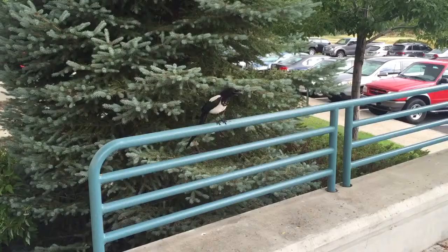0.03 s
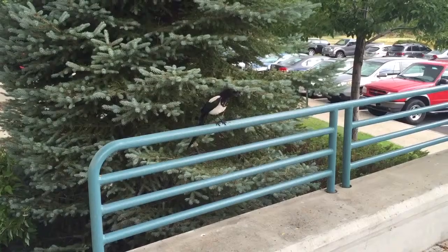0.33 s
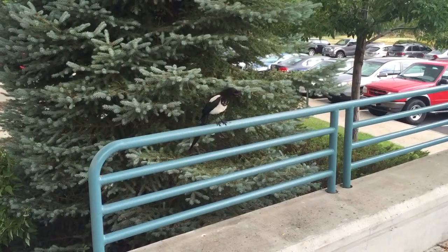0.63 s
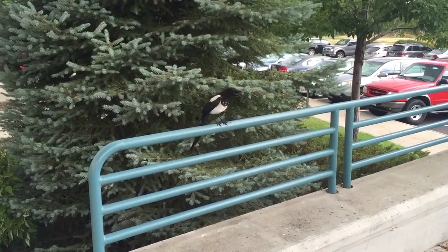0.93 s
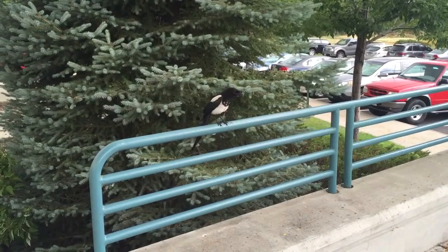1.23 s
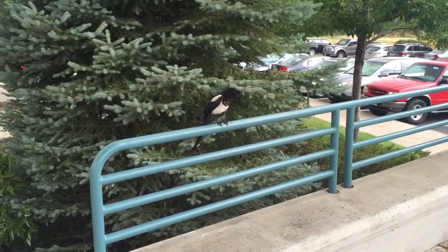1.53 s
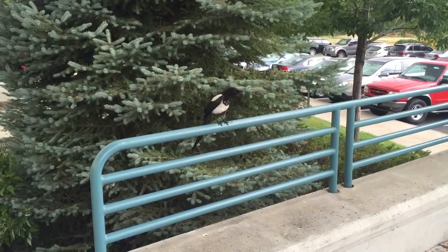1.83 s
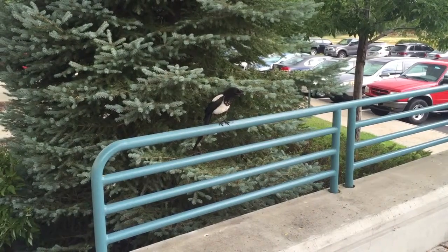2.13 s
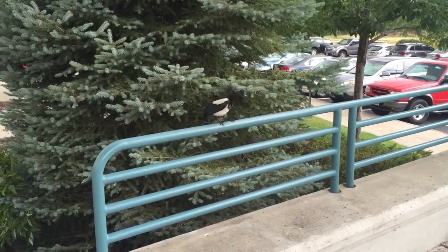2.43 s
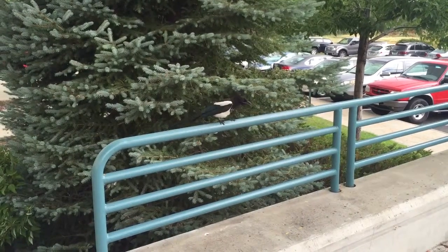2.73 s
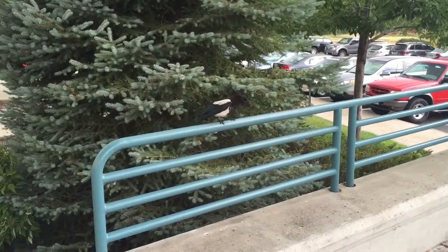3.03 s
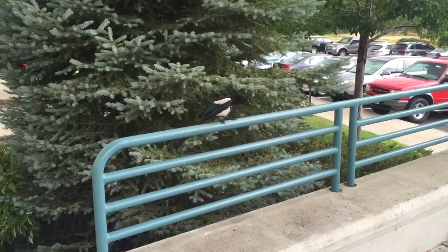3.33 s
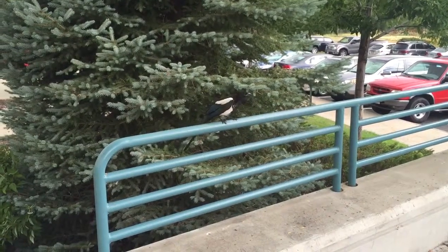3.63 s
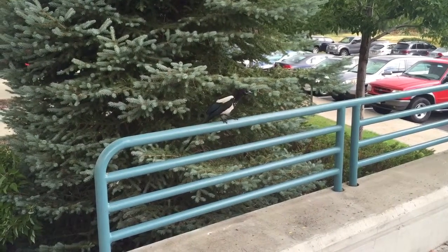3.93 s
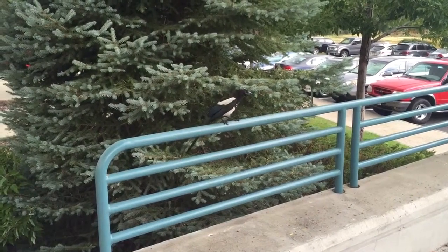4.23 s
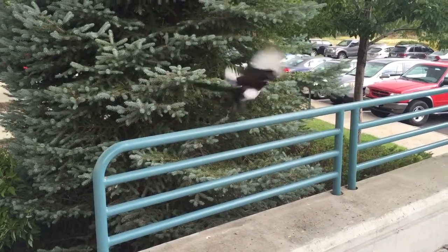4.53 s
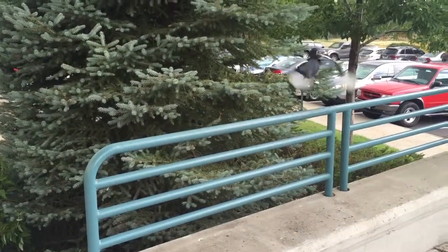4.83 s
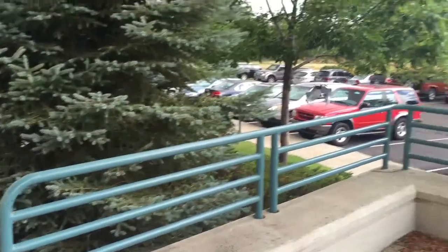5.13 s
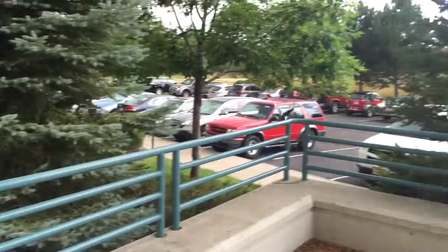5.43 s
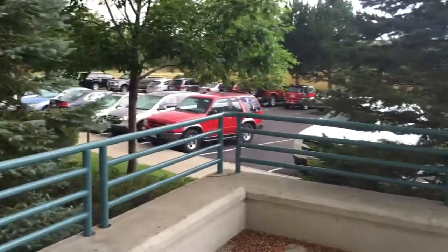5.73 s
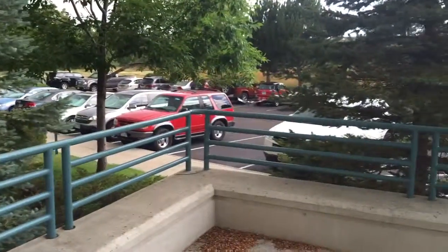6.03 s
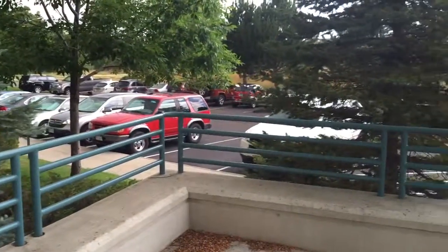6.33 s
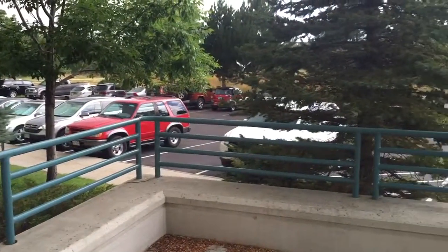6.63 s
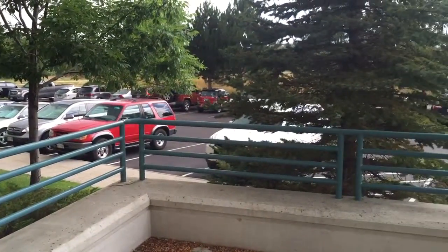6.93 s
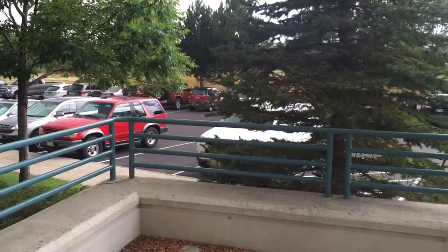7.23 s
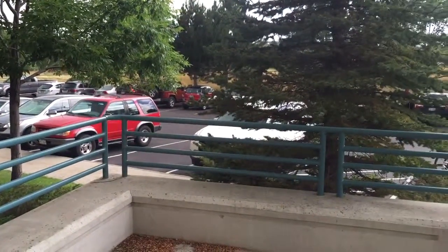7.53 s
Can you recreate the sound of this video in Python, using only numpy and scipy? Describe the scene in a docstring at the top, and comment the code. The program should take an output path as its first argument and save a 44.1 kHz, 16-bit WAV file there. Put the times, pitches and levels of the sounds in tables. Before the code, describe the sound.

A magpie chatters harshly nearby in three bursts, then fades away still calling as wind buffets the microphone over distant traffic.

```python
"""Far traffic drones and birds call faintly; then a magpie on a railing beside a car park
chatters in three bursts and flies off, still calling. Each syllable is a rough upward sweep
of the syrinx through the resonances of throat and beak, echoed by concrete and parked cars.
A few small ticks sound close by; from about halfway, wind eddies buffet the microphone."""
import sys
import numpy as np
from scipy import signal
from scipy.fft import rfft, irfft, next_fast_len
from scipy.io import wavfile
from scipy.ndimage import uniform_filter1d

SR = 44100
rng = np.random.default_rng(int(sys.argv[2]) if len(sys.argv) > 2 else 0)


def dump(signal):
    """Clip the signal to [-1, 1] and save it as 16-bit WAV at the path in sys.argv[1]."""
    limited = np.clip(np.atleast_2d(signal).T, -1, 1)
    pcm = np.round(limited * 32767).astype(np.int16)
    wavfile.write(sys.argv[1], SR, pcm)


N = 339570
TIME_S = np.arange(N) / SR
CUTOFF_HZ = 15300
PEAK_LEAD_S = 0.019  # effort peaks this long before the pitch crest

# road noise: freq_hz, gain_db
ROAD_SPECTRUM = [(12, -83.5), (20, -26), (35, -14.5), (49, -4), (194, -5), (229, -5.5), (263, -12),
                 (367, -16), (445, -20), (620, -19.5), (753, -23.5), (914, -21), (1310, -25.5),
                 (1510, -28.5), (15000, -58.5)]
# road noise: time_s, level_db
ROAD_LEVEL = [(0, -42.5), (.9, -46.5), (1.2, -44), (1.6, -43.5), (2.4, -44), (3.4, -44), (5.8, -45.5),
              (7.7, -47)]
# one curve per engine: time_s, pitch_hz, level_db
ENGINE_CURVES = [
    [(0, 103.4, -44), (.35, 106, -46), (.65, 107, -67)],
    [(1.3, 148, -57.5), (2.0, 150.2, -45), (2.5, 153.3, -46), (3.1, 153, -55.5)],
]
# distant bird: time_s, pitch_hz, level_db
WHISTLE_CURVE = [(.23, 2030, -56.5), (.255, 1980, -57.5), (.32, 2000, -49.5), (.35, 1990, -50),
                 (.367, 1996, -41), (.39, 2010, -56.5), (.45, 2005, -65)]
# distant magpie: start_s, crest_s, opening_hz, crest_hz, level_db
FAR_MAGPIE_SYLLABLES = [(0.40, 0.50, 660, 790, -63), (1.795, 1.89, 600, 725, -60),
                        (1.985, 2.098, 610, 720, -60), (6.831, 6.929, 630, 787, -61),
                        (7.252, 7.35, 620, 778, -75.5), (7.499, 7.605, 613, 778, -70)]
# near magpie: start_s, crest_s, opening_hz, crest_hz, bend (1 even, more = late rise), roughness,
# level_db, swell_db, rasp_db, beak_hz, sizzle_db
MAGPIE_SYLLABLES = [(0.539, 0.63, 671, 875.0, 4.2, 0.2, -22.0, 2.5, -0.5, 5000, 2),
                    (0.704, 0.799, 475, 836.5, 1.21, 0.61, -22.5, 9.5, -0.5, 5040, 4),
                    (0.881, 0.984, 430.7, 768, 1.64, 0.42, -23.5, 11, -4, 4600, 2),
                    (2.511, 2.58, 505.6, 887, 1.07, 0.36, -22.5, 0, -1, 4870.0, -2),
                    (2.649, 2.754, 430.6, 871, 1.11, 0.36, -22.5, 12, 0, 5300, 1.5),
                    (2.836, 2.932, 413.2, 851, 1.32, 0.43, -24, 10, 0.5, 4570, -1.5),
                    (3.046, 3.135, 392.4, 832.5, 1.19, 0.55, -23, 12, -1.5, 4370, -2.0),
                    (3.249, 3.322, 443.6, 780, 1.78, 0.6, -27, 9, -4, 4540.0, -3.5),
                    (3.729, 3.798, 578.3, 847, 2.64, 0.54, -22, 7, -2.5, 4900, -0.5),
                    (3.877, 3.989, 396.7, 812, 1.44, 0.34, -23.5, 14.5, -1.5, 4740, 0),
                    (4.083, 4.173, 488.6, 702, 1.7, 0.62, -24.5, 6.5, -4, 4650.0, -2.5),
                    (4.286, 4.393, 476.3, 799, 1.11, 0.46, -23.5, 12, -5, 4740, -1.5),
                    (4.514, 4.602, 388, 852, 1, 0.47, -28, 7, -0.5, 4400, -2),
                    (4.686, 4.776, 445.6, 902, 1.03, 0.54, -29.0, 2, -2, 4270, 2.5),
                    (4.822, 4.897, 509, 742, 0.8, 0.48, -29.5, 5, -3, 4630, 2),
                    (5.003, 5.105, 457.4, 860, 1.23, 0.4, -29.5, 4, -3.5, 4580.0, 1),
                    (5.203, 5.301, 487.5, 877, 1.9, 0.5, -31, 6.0, -3, 4500.0, 0),
                    (5.432, 5.515, 506.4, 891, 1.82, 0.42, -32.5, 4, -4, 4270.0, -1)]
# throat and beak resonances: freq_hz, gain_db
THROAT_SPECTRUM = [(300, -45), (650, -21.5), (1100, -19.5), (1600, -6.5), (2000, -9.5), (2400, -1.5),
                   (2900, 1.5), (3400, -9), (3850, -10), (4900, -10), (6570, -12), (8370, -19.5),
                   (9790, -20.5), (15000, -36)]
# concrete and a wall: delay_s, gain_db
HARD_ECHOES = [(.0093, -11), (0.026, -29.5)]
# scattered share, rising as the bird flies off: time_s, scatter_db
SCATTER_CURVE = [(0, -27.5), (3.7, -29), (4.6, -26), (5.05, -19.5), (5.5, -18)]
# close ticks and a knock: start_s, level_db, centre_hz, t60_s
TICK_EVENTS = [(1.312, -63, 11350, 0.043), (2.41, -62.5, 11000, 0.015), (2.473, -33, 290, 0.14)]
# wind noise: freq_hz, gain_db
WIND_SPECTRUM = [(20, -30.5), (38, -26.5), (54, 8.5), (80, 2), (125, 5), (245, 3.5), (290, 1.5),
                 (480, -10.5), (650, -11.5), (1170, -22), (1800, -35.5), (2600, -58.5), (4000, -91.5)]
# wind between gusts: time_s, buffet_db, rush_db, rumble_db, eddy_hz
BREEZE_CURVE = [(3.45, -42.5, -52, -61, 150), (3.75, -37.5, -52, -42.5, 157), (4.42, -36, -42.5, -45, 157),
                (4.79, -27, -31.5, -35, 209), (4.88, -34.5, -40, -37.5, 186), (5.6, -32, -40, -40.5, 186),
                (5.74, -41, -40.5, -46.5, 185), (6.0, -33.5, -40, -42, 205), (6.29, -41.5, -42, -45, 191),
                (6.58, -32, -38, -33, 165.4), (6.76, -38.5, -45, -45, 160), (7.45, -31.5, -39, -41.5, 152),
                (7.7, -29, -37.5, -43.5, 142.3)]
# gusts: start_s, length_s, buffet_db, rush_db, rumble_db
GUST_EVENTS = [(3.505, 0.11, -32, -52.5, -53), (3.64, 0.042, -28, -43.5, -50), (4.274, 0.11, -43, -68, -38),
               (4.463, 0.15, -20.5, -26.5, -23.5), (4.59, 0.16, -21.5, -31.5, -20.5),
               (5.281, 0.05, -28, -38, -44), (5.45, 0.018, -23, -32.5, -35),
               (5.802, 0.054, -28.5, -37, -43), (5.919, 0.039, -25.5, -41, -36),
               (6.064, 0.023, -26.5, -40, -48), (6.127, .05, -22, -34.5, -51),
               (6.299, 0.062, -32, -39, -39), (6.419, 0.13, -26, -37, -36.5),
               (6.798, 0.13, -32, -37.5, -43), (7.021, 0.11, -26.5, -34.5, -35),
               (7.198, .05, -17, -33, -45), (7.285, .135, -20.5, -33, -43.5),
               (7.506, 0.1, -29.5, -40.5, -39)]


def from_db(db):
    """Decibels to gain."""
    return 10 ** (np.asarray(db) / 20)


def unit_rms(x):
    """Scale to rms 1."""
    return x / np.sqrt(np.mean(x ** 2) + 1e-20)


def follow(curve):
    """Each value column of a curve, per sample."""
    time_s, *columns = np.transpose(curve)
    return [np.interp(TIME_S, time_s, column) for column in columns]


def gate(curve, fade_s):
    """1 while a curve lasts, fading to 0 outside it."""
    return np.clip(1 + np.minimum(TIME_S - curve[0][0], curve[-1][0] - TIME_S) / fade_s, 0, 1)


def butter(x, hz, kind, order=2):
    """Butterworth filter."""
    return signal.sosfilt(signal.butter(order, hz, kind, fs=SR, output="sos"), x)


def split(x, hz, order=4):
    """Low and high bands that sum to x."""
    low = signal.sosfiltfilt(signal.butter(order, hz, fs=SR, output="sos"), x)
    return low, x - low


def colour(x, spectrum):
    """Apply a spectrum table; rms 1."""
    hz, db = np.transpose(spectrum)
    size = next_fast_len(len(x))
    bins_hz = np.maximum(np.arange(size // 2 + 1) * SR / size, 1)
    gain = from_db(np.interp(np.log(bins_hz), np.log(hz), db))
    return unit_rms(irfft(rfft(x, size) * gain, size)[:len(x)])


def flutter(size, rate_hz):
    """Random motion up to rate_hz; rms 1."""
    run_in = 4000
    return unit_rms(butter(rng.standard_normal(size + run_in), rate_hz, "low")[run_in:])


def flatten(x, window_s):
    """Hold short-term rms at 1, keeping the faster grain."""
    return x / np.sqrt(np.abs(uniform_filter1d(x ** 2, int(window_s * SR))) + 1e-9)


def convolve(x, response):
    """Apply an impulse response at unit energy."""
    return signal.fftconvolve(x, response / np.linalg.norm(response))[:len(x)]


def tone(curve, waver, waver_hz):
    """Sine with slightly unsteady pitch."""
    pitch_hz, level_db = follow(curve)
    phase = 2 * np.pi * np.cumsum(pitch_hz * (1 + waver * flutter(N, waver_hz))) / SR
    return np.sqrt(2) * np.sin(phase) * from_db(level_db) * gate(curve, fade_s=0.026)


def traffic():
    """Far road noise and two engines droning in the car park."""
    level_db, = follow(ROAD_LEVEL)
    road = colour(rng.standard_normal(N), ROAD_SPECTRUM) * from_db(level_db)
    return road + sum(tone(engine, waver=0.01, waver_hz=13) for engine in ENGINE_CURVES)


def far_whistle():
    """A distant bird's short, nearly pure note."""
    return tone(WHISTLE_CURVE, waver=0.0038, waver_hz=83.3)


def air_pressure(t, start_s, crest_s, bend):
    """Climbs from 0 to 1 at the crest, then drops."""
    rise = np.clip((t - start_s) / (crest_s - start_s), 0, 1) ** bend
    fall = np.clip((t - crest_s) / .045, 0, 1)
    return uniform_filter1d(rise - fall, size=300)


def pulse_train(phase, pitch_hz, lag_rad=.16):
    """Equal harmonics; the high ones lag, so each pulse is a chirp."""
    return unit_rms(sum(np.cos(k * phase - lag_rad * k * k) * (k * pitch_hz < CUTOFF_HZ)
                        for k in np.arange(1, CUTOFF_HZ // 400)))


def syrinx(t, start_s, crest_s, opening_hz, crest_hz, bend, roughness, end_roughness=.7):
    """Pulses sweep up and tip over; the membranes rattle at both ends and lock near the top."""
    progress = (t - start_s) / (crest_s - start_s)
    unlocked = np.clip(np.abs(progress - .7) / .48, 0, 1) ** 3
    roughness = roughness + end_roughness * unlocked
    pitch_hz = opening_hz * (crest_hz / opening_hz) ** air_pressure(t, start_s, crest_s, bend)
    pitch_hz *= 1 + 0.04116 * roughness * flutter(len(t), 150)
    phase = 2 * np.pi * np.cumsum(pitch_hz) / SR
    jittered = phase + .36 * roughness * flutter(len(t), 470)  # blurs mainly the high harmonics
    hiss = rng.standard_normal(len(t)) * (1 + 0.2 * np.cos(jittered))  # air escapes once a cycle
    # the throat tunes to harmonic 4, which rings unsteadily
    fourth = np.cos(4 * phase) * from_db(8.2 * flutter(len(t), 37))
    overtones = .4 * (np.cos(6 * phase) + np.sin(7 * phase) - np.cos(8 * phase))
    ringing = np.clip(1 - roughness, 0, 1) * (fourth + overtones)
    shimmer = from_db(1.5 * roughness * flutter(len(t), 260))
    return (pulse_train(jittered, pitch_hz) + .5 * roughness * hiss) * shimmer + ringing


def far_magpie(band_hz=(2300, 3200)):
    """Distance leaves only the strongest throat resonance."""
    out = np.zeros(N)
    for start_s, crest_s, opening_hz, crest_hz, level_db in FAR_MAGPIE_SYLLABLES:
        first = int(start_s * SR)
        span = slice(first, first + SR // 7)
        voice = syrinx(TIME_S[span], start_s, crest_s, opening_hz, crest_hz,
                       bend=1, roughness=.4, end_roughness=.3)
        voice = flatten(butter(voice, band_hz, "band"), window_s=.02)
        out[span] += voice * np.sqrt(np.hanning(len(voice))) * from_db(level_db)
    return out


def effort(t, start_s, crest_s, swell_db, attack_s=0.026, sag_db_per_s=129, release_db_per_s=562.5):
    """Syllable envelope in dB below its peak: attack, swell, sag, release."""
    peak_s = crest_s - PEAK_LEAD_S
    attack_db = 18 * np.maximum(1 - (t - start_s) / attack_s, 0) ** 2
    rise_db = swell_db * np.clip((peak_s - t) / (peak_s - start_s), 0, 1)
    sag_db = sag_db_per_s * np.maximum(t - peak_s, 0)
    release_db = release_db_per_s * np.maximum(t - crest_s - 0.0081, 0)
    return -(attack_db + rise_db + sag_db + release_db)


def scatter(x, share_db, t60_s):
    """Brief reflections off rails and branches, new at each turn of the head."""
    age_s = TIME_S[:SR // 50]
    spray = rng.standard_normal(len(age_s)) * from_db(-60 * age_s / t60_s) * np.minimum(age_s / .001, 1)
    return x + from_db(share_db) * convolve(x, spray)


def throat_body(band, hollow_db, past_peak_s, chest_hz=1940, ring_db=1, ring_width_s=0.023):
    """Low band: hollow while the beak is shut, ringing out at peak effort."""
    chest, ring = split(scatter(band, share_db=-5, t60_s=.014), chest_hz, order=3)
    body = flatten(chest * from_db(hollow_db) + ring, window_s=0.013)
    return body * from_db(ring_db * np.exp(-(past_peak_s / ring_width_s) ** 2))


def beak_rasp(band, beak_hz, top_db, sizzle_hz=7650):
    """High band: coloured by the beak's resonance, with sizzle on top."""
    resonance = signal.lfilter(*signal.iirpeak(beak_hz, Q=8.7, fs=SR), band)
    rasp = scatter(band + from_db(-1) * resonance, share_db=-3, t60_s=.012)
    rasp, sizzle = split(flatten(rasp, window_s=.015), sizzle_hz, order=2)
    return rasp + sizzle * from_db(top_db)


def magpie(rasp_hz=3410, rasp_sag_db_per_s=77):
    """Syrinx through throat and beak; the rasp grows as the beak opens and dies first."""
    out = np.zeros(N)
    for (start_s, crest_s, opening_hz, crest_hz, bend, roughness,
         level_db, swell_db, rasp_db, beak_hz, sizzle_db) in MAGPIE_SYLLABLES:
        first = int((start_s - .03) * SR)
        span = slice(first, first + SR // 4)
        t = TIME_S[span]
        effort_db = effort(t, start_s, crest_s, swell_db)
        past_peak_s = t - crest_s + PEAK_LEAD_S
        shut = np.clip(1 - (t - start_s) / (0.9 * (crest_s - start_s)), 0, 1)
        tight_db = 0.42 * swell_db  # a bigger swell starts with the beak shut tighter
        voice = syrinx(t, start_s, crest_s, opening_hz, crest_hz, bend, roughness)
        low, high = split(colour(voice, THROAT_SPECTRUM), rasp_hz)
        body = throat_body(low, (14 + tight_db) * shut, past_peak_s)
        top_db = sizzle_db + 1.5 + 0.45 * np.maximum(effort_db, -10) - 3.5 * shut
        dull_db = (5 + tight_db) * shut ** 2 + rasp_sag_db_per_s * np.maximum(past_peak_s, 0)
        rasp = beak_rasp(high, beak_hz, top_db) * from_db(rasp_db + 1.4 - dull_db)
        out[span] += (body + rasp) * from_db(level_db + effort_db)
    return out


def outdoors(x, tail_t60_s=0.58, tail_hz=3800, spruce_t60_s=0.2, spruce_hz=9100, spruce_db=-10.5):
    """Hard echoes, bright scatter off a spruce, and a dull tail that swells as parked cars reflect."""
    echoes = sum(from_db(gain_db) * np.interp(TIME_S - delay_s, TIME_S, x, left=0)
                 for delay_s, gain_db in HARD_ECHOES)
    age_s = TIME_S[:SR]
    onset = np.minimum(age_s / 0.0042, 1)
    cars_db = 7.5 * np.exp(-((age_s - .08) / 0.011) ** 2)
    dull = butter(rng.standard_normal(SR), tail_hz, "low") * from_db(cars_db - 60 * age_s / tail_t60_s)
    bright = butter(rng.standard_normal(SR), spruce_hz, "high", order=1)
    bright *= from_db(-60 * age_s / spruce_t60_s)
    scatter_db, = follow(SCATTER_CURVE)
    tail = convolve(x * from_db(scatter_db), dull * onset)
    spruce = from_db(spruce_db) * convolve(x, bright * onset)
    return x + echoes + tail + spruce


def ticks():
    """Two ticks and a knock: dying puffs of band-passed noise."""
    out = np.zeros(N)
    for start_s, level_db, centre_hz, t60_s in TICK_EVENTS:
        decay = (TIME_S > start_s) * from_db(-60 * np.clip((TIME_S - start_s) / t60_s, 0, 2))
        puff = butter(rng.standard_normal(N) * decay, [centre_hz / 1.9, centre_hz * 1.19], "band")
        out += puff * np.sqrt(SR / 2 / centre_hz) * from_db(level_db)
    return out


def wind_gains(attack_s=0.021, release_db_per_s=221):
    """Buffet, rush and rumble gains: gusts rise, hold and die away on top of the breeze."""
    power = (from_db(follow(BREEZE_CURVE)[:3]) * gate(BREEZE_CURVE, fade_s=0.65)) ** 2
    for start_s, length_s, *levels_db in GUST_EVENTS:
        rise = np.clip((TIME_S - start_s) / attack_s, 0, 1)
        fall = from_db(-release_db_per_s * np.clip(TIME_S - start_s - length_s, 0, 1))
        power += np.outer(from_db(levels_db), rise * fall) ** 2
    return np.sqrt(power)


def wind(rumble_top_hz=74, buffet_mid_hz=175, rush_bottom_hz=383, lumps_db=1.5, swirl_db=1.4):
    """Eddies at the microphone port: large ones rumble and thump, small ones rush in quick lumps."""
    buffet_gain, rush_gain, rumble_gain = wind_gains()
    eddy_hz = follow(BREEZE_CURVE)[-1]
    large, small = split(colour(rng.standard_normal(N), WIND_SPECTRUM), rush_bottom_hz)
    deep, middle = split(large, rumble_top_hz)
    slow, quick = split(middle, buffet_mid_hz)
    rumble = flatten(deep, window_s=0.037) * rumble_gain * from_db(-3)
    tilt = (eddy_hz / buffet_mid_hz) ** 5.2  # faster eddies shift the buffeting up
    buffet = flatten(slow + quick * tilt, window_s=.04) * buffet_gain
    rush = flatten(small * from_db(lumps_db * flutter(N, 70)), window_s=0.081) * rush_gain
    return (rumble + buffet + rush) * from_db(swirl_db * flutter(N, 14))


def scene():
    """Birds in open air over traffic, wind and ticks; mono."""
    birds = magpie() + far_magpie() + far_whistle()
    return (outdoors(birds) + traffic() + wind() + ticks())[None]


def record(dry):
    """Steep elliptic low-pass."""
    return signal.sosfilt(signal.ellip(12, .1, 90, CUTOFF_HZ, fs=SR, output="sos"), dry)


dry = scene()
out = record(dry)
dump(out)
```